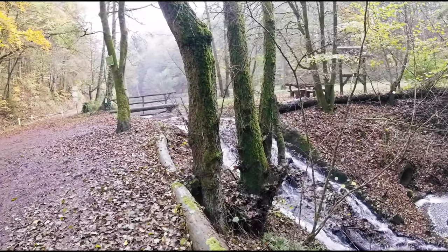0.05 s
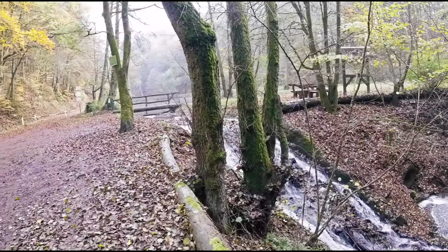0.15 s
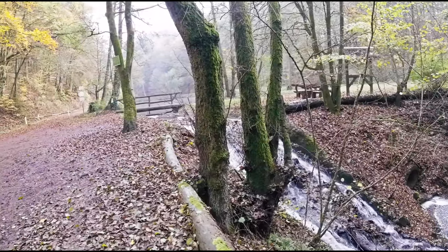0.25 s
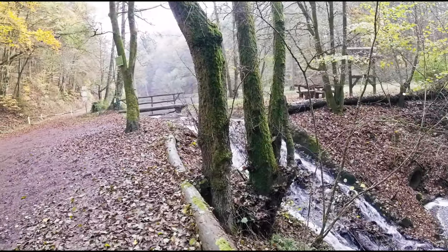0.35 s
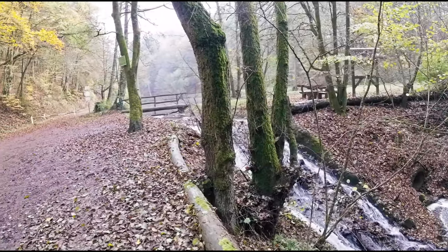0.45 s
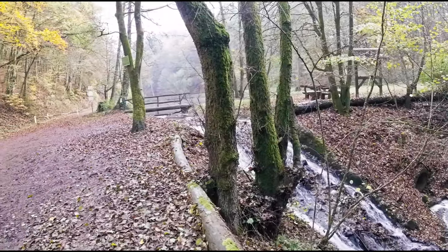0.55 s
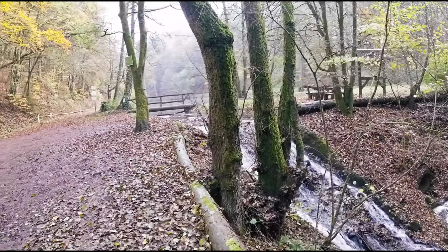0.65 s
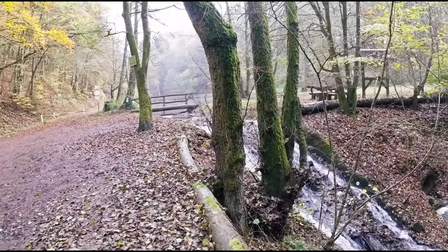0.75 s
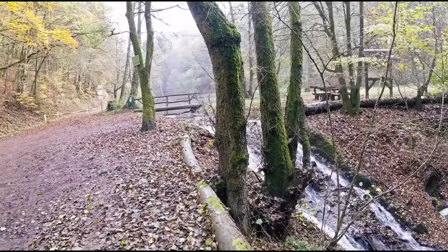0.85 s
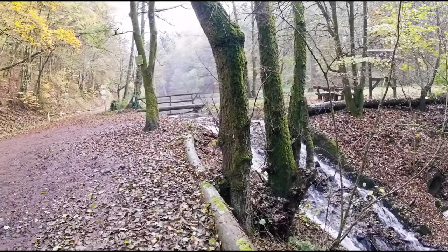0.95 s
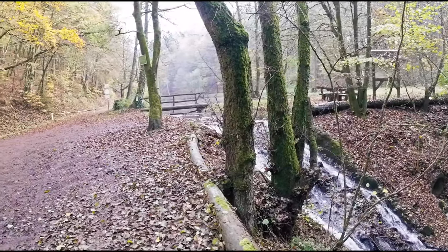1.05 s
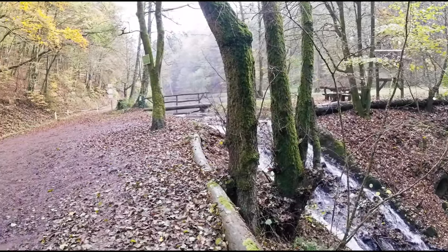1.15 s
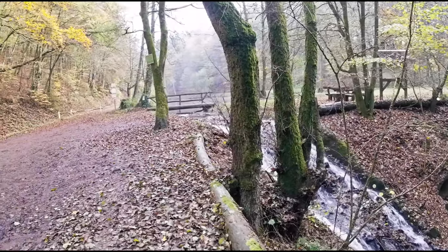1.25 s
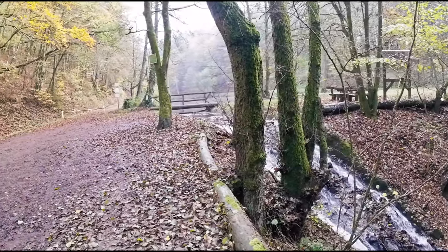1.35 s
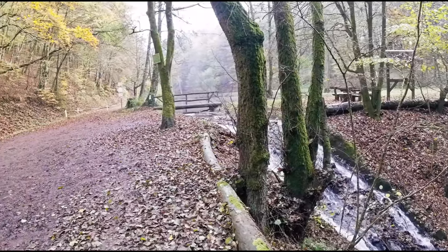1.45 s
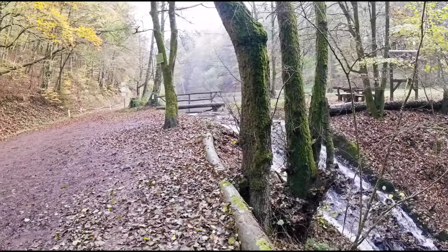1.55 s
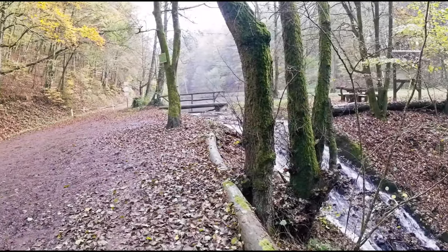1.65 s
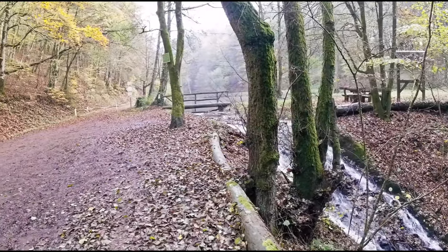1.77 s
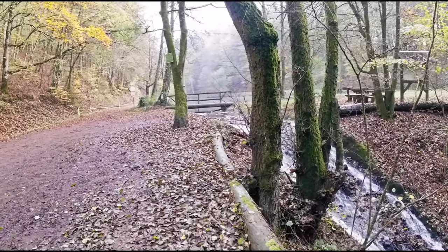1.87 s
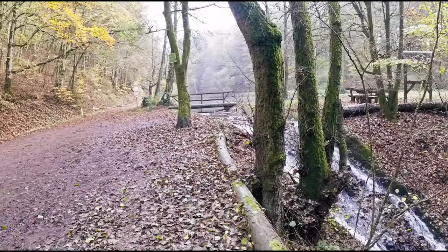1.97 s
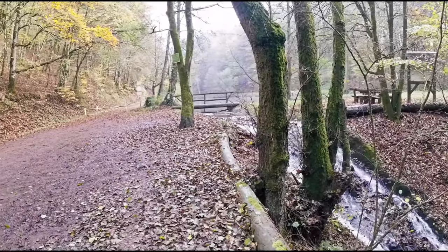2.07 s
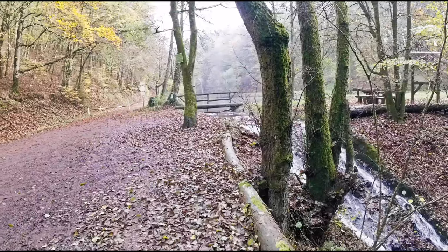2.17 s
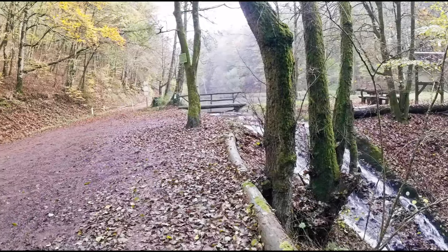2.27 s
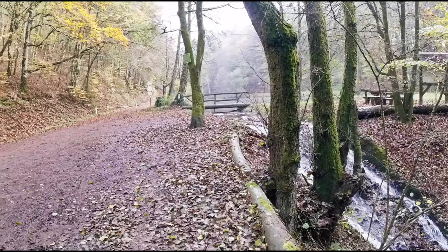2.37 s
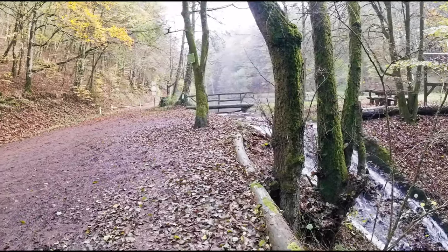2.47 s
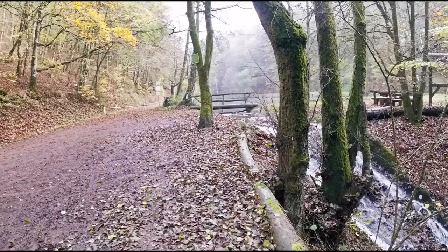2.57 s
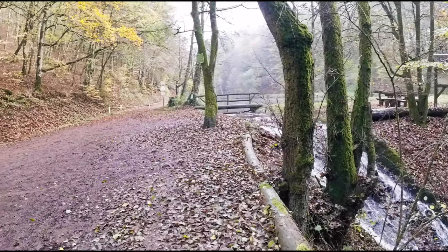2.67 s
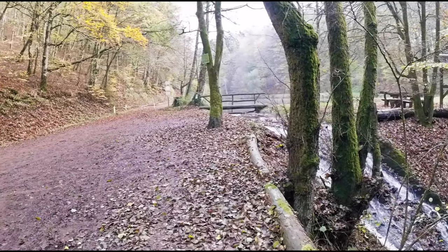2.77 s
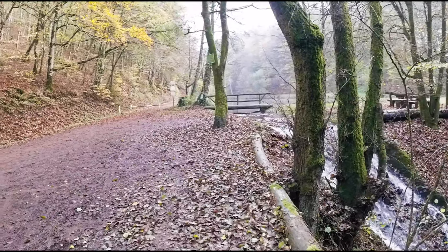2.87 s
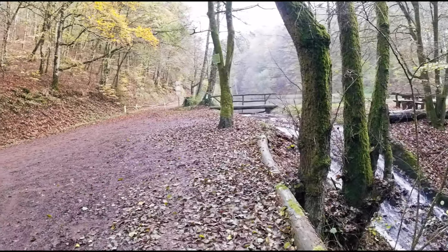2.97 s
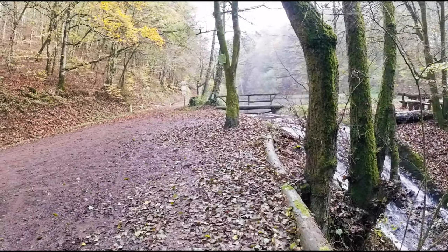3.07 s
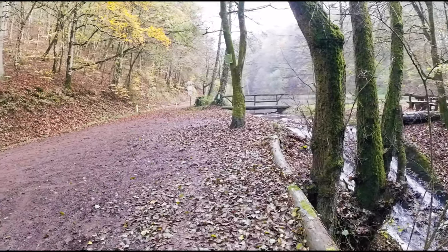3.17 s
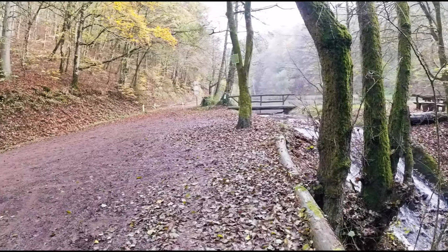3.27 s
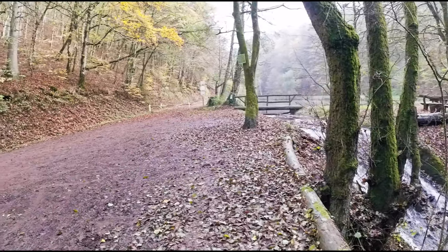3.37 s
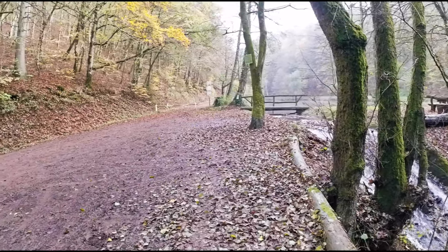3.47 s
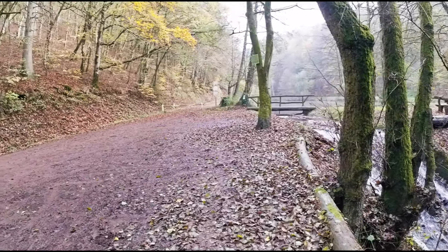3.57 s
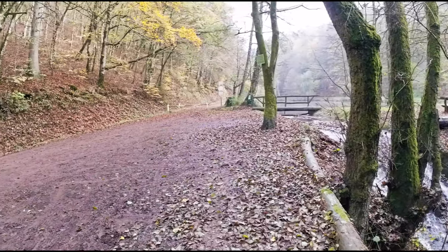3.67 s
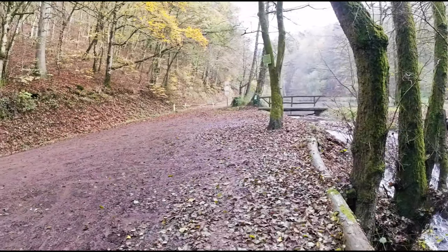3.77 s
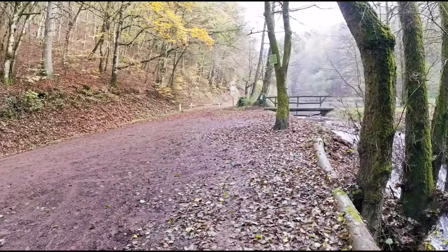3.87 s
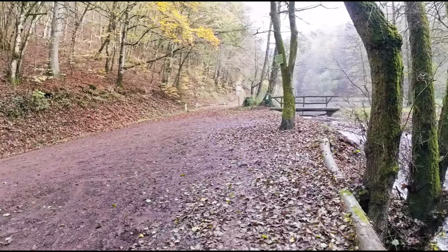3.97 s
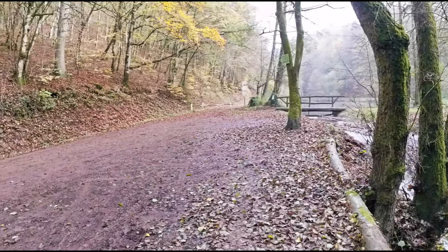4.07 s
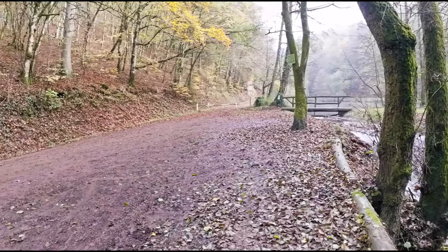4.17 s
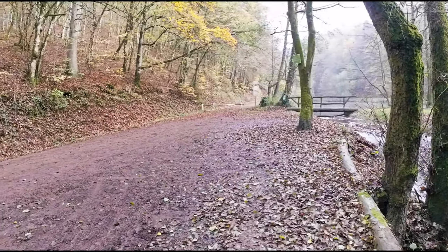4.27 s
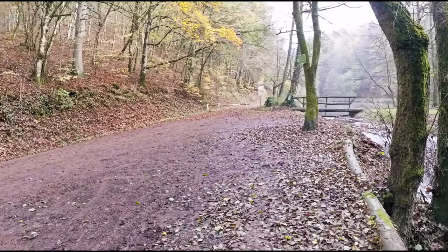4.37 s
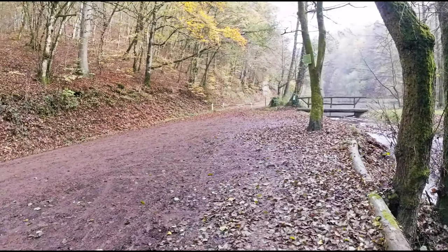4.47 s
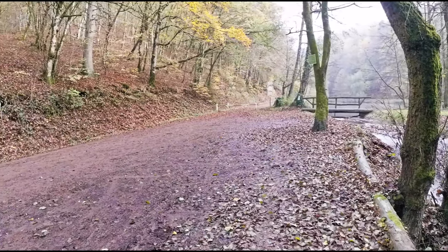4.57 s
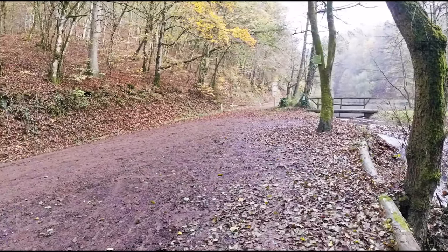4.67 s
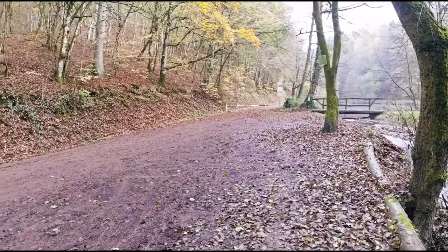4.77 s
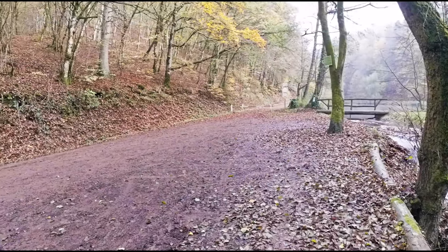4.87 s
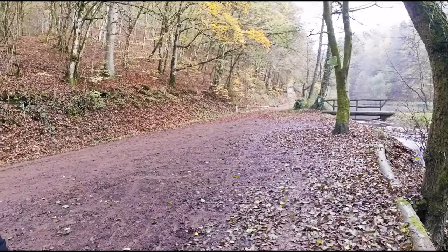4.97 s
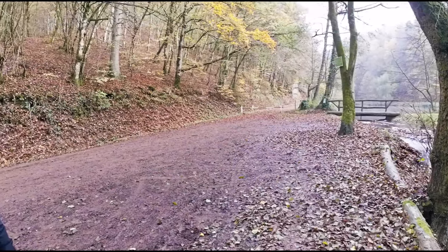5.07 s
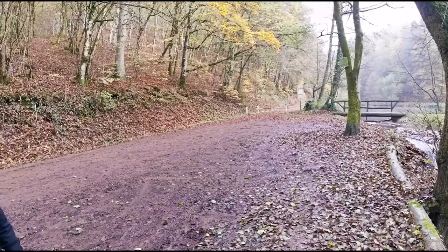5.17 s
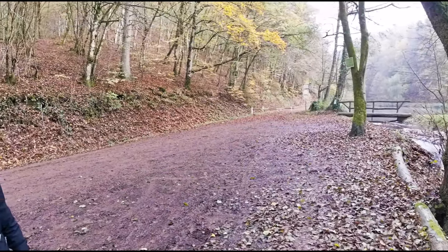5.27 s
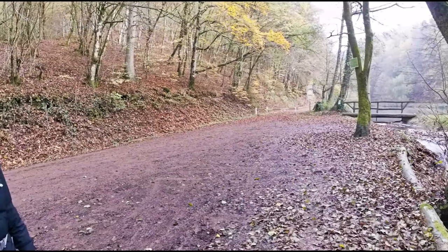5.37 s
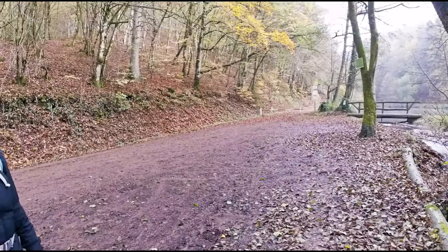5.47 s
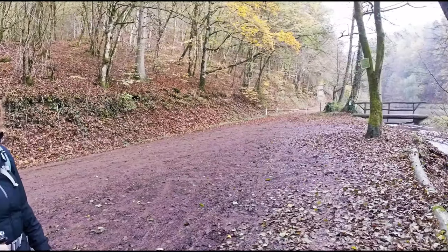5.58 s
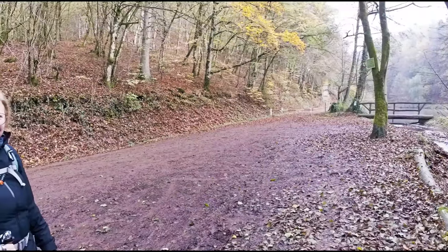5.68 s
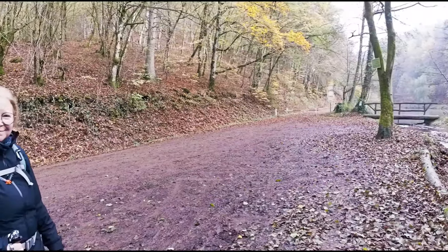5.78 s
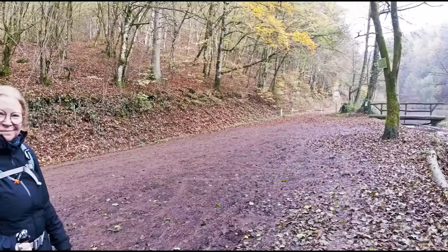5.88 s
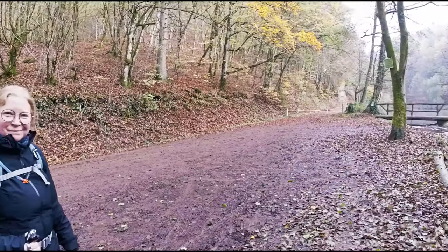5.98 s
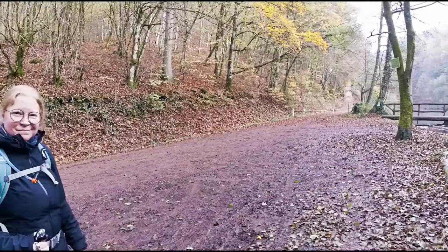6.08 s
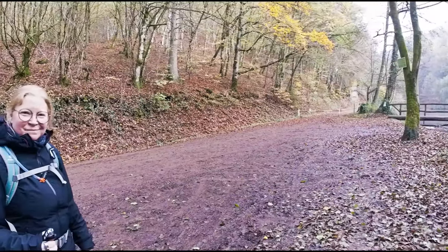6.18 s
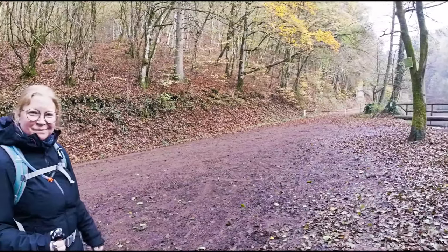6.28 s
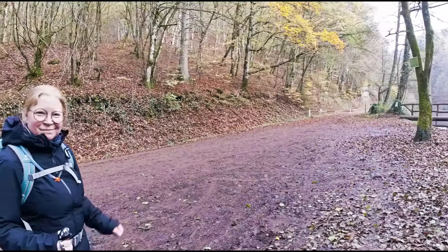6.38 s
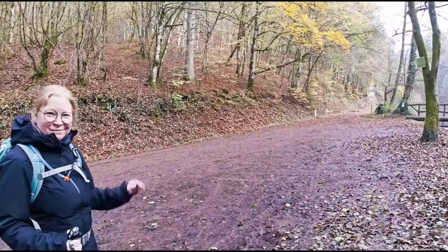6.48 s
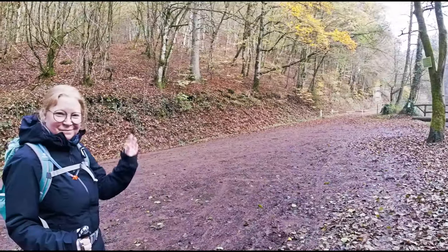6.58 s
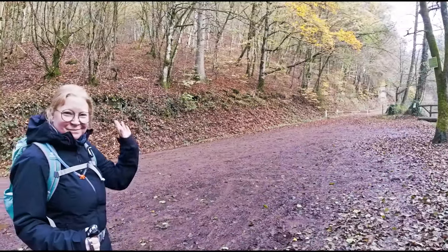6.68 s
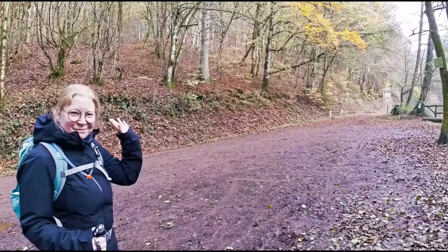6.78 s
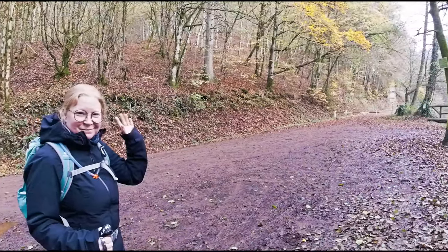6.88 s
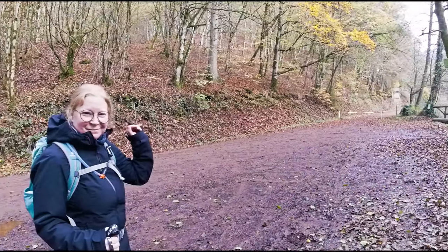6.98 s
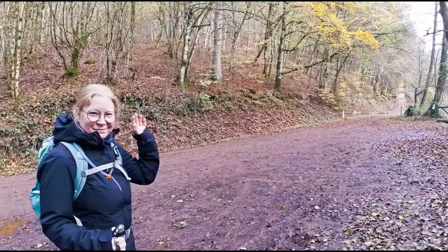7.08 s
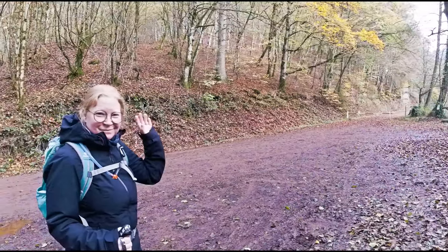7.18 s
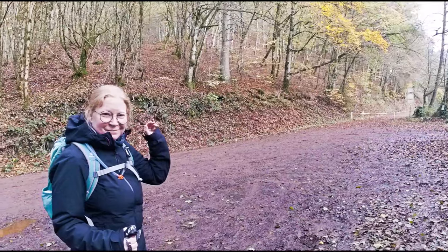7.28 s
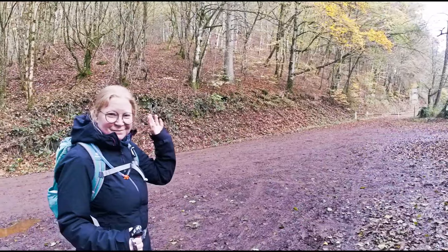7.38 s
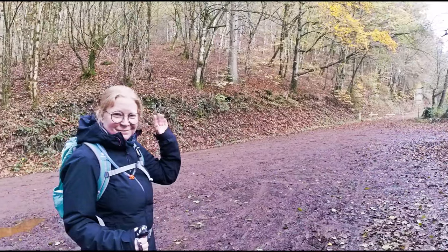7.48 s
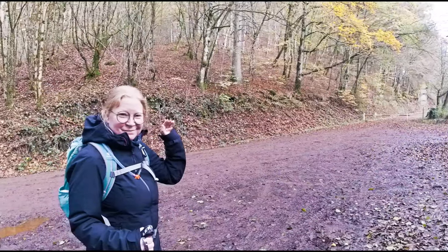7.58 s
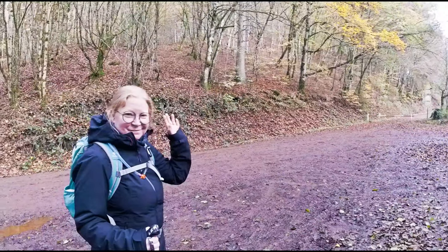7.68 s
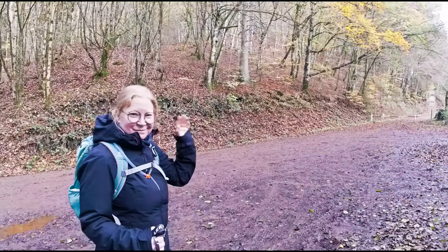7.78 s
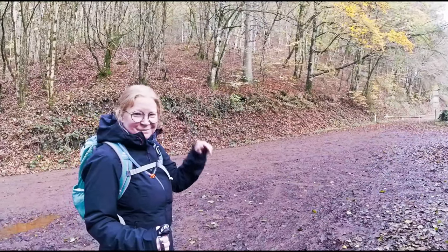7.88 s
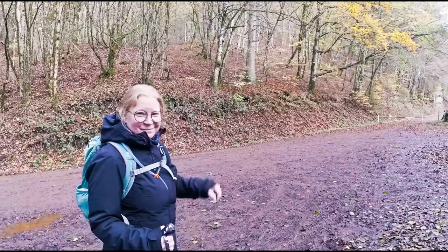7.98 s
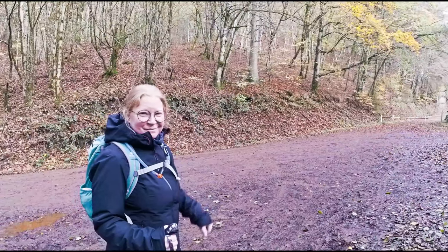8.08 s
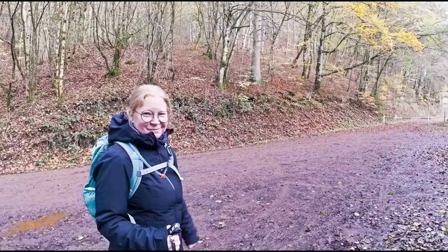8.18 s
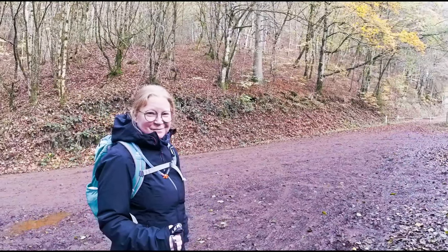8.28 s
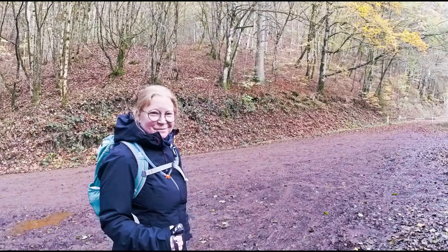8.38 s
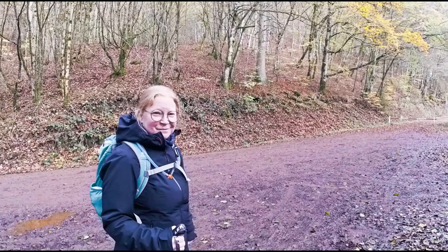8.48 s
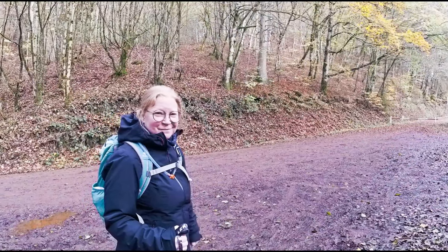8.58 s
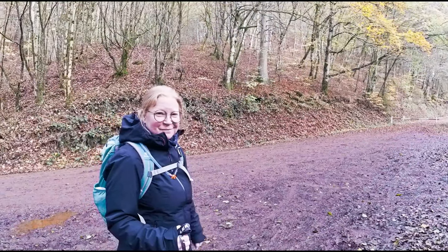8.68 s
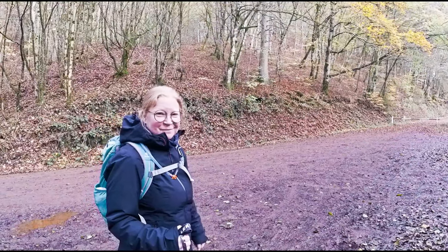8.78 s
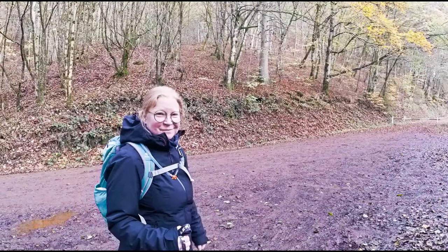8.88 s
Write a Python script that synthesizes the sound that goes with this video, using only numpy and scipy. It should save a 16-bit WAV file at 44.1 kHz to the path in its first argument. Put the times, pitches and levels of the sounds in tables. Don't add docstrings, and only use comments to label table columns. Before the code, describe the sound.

From 0 seconds a forest stream rushes down a stepped cascade a few metres from one microphone: a dense, even roar of merged bubbles, strongest in the midrange, flickering finely, with droplets crackling on top and small bubbles ringing in clumps. The top is limited, with little airy hiss. Underneath, a trapped air pocket gulps at low pitch, busiest in the first two seconds and around 3.6 to 5, and a hand makes faint dull thuds on the microphone housing. After 1 second the microphone slowly turns away, making the water gradually a little quieter and duller until 7. A small high plop comes at the very start, lower ones near 3.4 and 4.5, fuller ones near 6.8 and 7.4, and a last higher one at 8.7, almost lost in the fade. From 7 everything fades steadily, reaching silence at about 9.

```python
import sys
import numpy as np
from scipy import signal
from scipy.fft import rfft, irfft, next_fast_len
from scipy.io import wavfile

SR = 44100
rng = np.random.default_rng(int(sys.argv[2]) if len(sys.argv) > 2 else 0)


def generate_wav(sig):
    pcm = np.round(np.clip(np.atleast_2d(sig).T, -1, 1) * 32767).astype(np.int16)
    wavfile.write(sys.argv[1], SR, pcm)


def gain_from_decibels(decibels):
    exponent = np.asarray(decibels, float) / 20
    return 10 ** exponent


N = 394254
SECONDS = np.arange(N) / SR
FIRST_RATE_HZ = 16000


def rms_one(x):
    return x / np.sqrt(np.mean(x ** 2) + 1e-20)


def drift(rate):
    r = np.exp(-80 * np.pi * rate / SR)
    noise = rng.standard_normal(N // 40 + 2002)
    slow = signal.lfilter([1], [1, -2 * r, r * r], noise)[2000:]
    return np.interp(np.arange(N) / 40, np.arange(len(slow)), rms_one(slow))


def ring(clicks, hz, t60):
    r = gain_from_decibels(-60 / (t60 * SR))
    w = 2 * np.pi * hz / SR
    return signal.lfilter([0, np.sin(w)], [1, -2 * r * np.cos(w), r * r], clicks + 1e-18)


def grains(per_s, spread_db):
    sizes = gain_from_decibels(spread_db * np.minimum(rng.exponential(1, N), 4))
    signs = rng.choice([-1, 1], N)
    return rms_one(sizes * signs * (rng.random(N) < per_s / SR))


def coloured(x, spectrum):
    size = next_fast_len(N)
    hz = np.maximum(np.fft.rfftfreq(size, 1 / SR), 1)
    table_hz, table_db = np.transpose(spectrum)
    return rfft(x, size) * gain_from_decibels(np.interp(np.log(hz), np.log(table_hz), table_db)), hz


def blips(events, rise_s, trim_db):
    out = np.zeros(N + SR)
    t = np.arange(SR // 4) / SR
    shape = (t / rise_s * np.exp(1 - t / rise_s)) ** 2
    for s, peak_db, hz in events:
        at = max(round((s - 0.4 * rise_s) * SR), 0)
        tone = np.sin(2 * np.pi * hz * t * (0.966 + 0.3 * t))
        out[at:at + len(t)] += gain_from_decibels(peak_db + trim_db) * shape * tone
    return out[:N]


# (time [s], turn [0-1])
MICROPHONE_TURN = [(0.0, 0.04), (1.0, 0), (2.5, 0.17), (4.4, 0.41), (5.2, 0.64), (7.0, 1), (8.94, 1.18)]


def microphone_turn():
    s, turn = np.transpose(MICROPHONE_TURN)
    return np.interp(SECONDS, s, turn)


# (frequency [Hz], level [dB])
ROAR_COLOUR = [(25, -52.5), (160, -23), (188, -15), (235, -16.5), (320, -8), (430, -3), (705, -5),
               (755, 0.5), (1100, -3), (1900, -5.5), (4400, -7.5), (6100, -13.5), (7330, -25), (8000, -37)]


def cascade(treble_db, bass_db):
    bass_hz, middle_hz, treble_hz = 336, 1000, 2300
    roar, hz = coloured(rng.standard_normal(N), ROAR_COLOUR)
    crackle, hz = coloured(grains(per_s=900.0, spread_db=4.0), ROAR_COLOUR)
    droplets = np.clip(0.37 / (1 + (7000 / hz) ** 3.0), 0, 0.95)
    water = np.sqrt(1 - droplets) * roar + np.sqrt(droplets) * crackle
    surge_db = 0.18 * drift(1.8) + 0.23 * drift(15.0)
    treble_change_db = treble_db - treble_db[:SR].mean()
    bass_change_db = bass_db - bass_db[:SR].mean()
    step = 0.4
    out = 0
    for centre in 30 * 2 ** np.arange(0, 8.6, step):
        band = np.clip(1 - np.abs(np.log2(hz / centre)) / step, 0, 1)
        part = irfft(water * band)[:N]
        up = np.clip(np.log(centre / middle_hz) / np.log(treble_hz / middle_hz), 0, 1.3)
        down = np.clip(np.log(middle_hz / centre) / np.log(middle_hz / bass_hz), 0, 1)
        colour_db = up * treble_change_db + down * bass_change_db
        lumpy_db = 2.5 if centre < 240 else 0.33 + 0.11 * up
        out = out + part * gain_from_decibels(colour_db + lumpy_db * drift(20.0) + surge_db)
    middle_band = signal.butter(4, [500, 1500], "band", fs=SR, output="sos")
    return out / np.std(signal.sosfilt(middle_band, out[:2 * SR]))


def bubbles():
    clicks = grains(per_s=250.0, spread_db=3.5)
    clicks = clicks * gain_from_decibels(3.0 * drift(4.5))
    pitches = np.geomspace(420, 2600, num=16)
    dealt = rng.integers(0, len(pitches), N)
    rings = sum(ring(clicks * (dealt == k), hz, 18.0 / hz) for k, hz in enumerate(pitches))
    band = signal.butter(3, [300, 4000], "band", fs=SR, output="sos")
    return rms_one(signal.sosfilt(band, rings))


# (time [s], peak level [dB], pitch [Hz])
HAND_THUDS = [(0.0, -51, 60), (0.12, -50, 135), (0.6, -49, 125), (1.07, -57, 100), (1.97, -52, 135),
              (3.12, -60, 55), (3.21, -65, 120), (3.63, -57, 135), (4.83, -57, 135), (5.37, -54, 120),
              (6.2, -57, 90), (6.72, -55, 121), (7.0, -59, 101), (8.04, -60, 110)]


def hand():
    return blips(HAND_THUDS, rise_s=0.014, trim_db=-0.5)


# (time [s], peak level [dB], pitch [Hz])
STRONG_GLUGS = [(0.063, -43, 192), (0.119, -37, 219), (0.188, -38, 183), (0.528, -40, 194),
                (0.723, -37, 195), (0.844, -46, 199), (1.082, -40, 204), (1.133, -41, 178),
                (1.189, -43, 202), (1.28, -44, 204), (1.552, -39, 195), (1.744, -42, 207),
                (1.966, -42, 198), (2.501, -41, 195), (2.74, -43, 196), (2.93, -41, 194), (3.598, -43, 188),
                (3.773, -40, 199), (3.83, -42, 196), (3.919, -44, 191), (4.002, -42, 194),
                (4.258, -45, 216), (4.433, -43, 203), (4.558, -42, 189), (4.826, -42, 210),
                (4.915, -40.5, 190), (5.894, -45, 186), (6.098, -42, 194), (7.349, -42.5, 192.8),
                (7.457, -42, 207)]


def air_pocket():
    count = 34
    chance = rng.standard_normal((count, 3))
    jitter = np.clip(0.3 * chance[:, 0], -0.5, 0.5)
    s = (np.arange(count) + 0.5 + jitter) * N / SR / count
    peak_db = -49 + 2 * chance[:, 1]
    pitch_hz = 195 + 12 * chance[:, 2]
    weak_glugs = np.transpose([s, peak_db, pitch_hz])
    return blips([*STRONG_GLUGS, *weak_glugs], rise_s=0.0202, trim_db=-3.5)


# (time [s], peak level [dB], pitch [Hz])
BIG_BUBBLES = [
    (0.065, -27, 1270),
    (3.36, -25, 764),
    (4.549, -25, 790),
    (6.832, -23, 860),
    (7.436, -24, 870),
    (8.717, -23, 960),
]


def plops():
    return blips(BIG_BUBBLES, rise_s=0.004, trim_db=-0.5)


def scene():
    turn = microphone_turn()
    water = cascade(treble_db=-1.8 * turn, bass_db=-0.8 * turn) + gain_from_decibels(-14.0) * bubbles()
    water = gain_from_decibels(-30.5 - 2.5 * turn) * water
    fade_start_s, fade_end_s = 7.03, 9.01
    fade = np.clip((fade_end_s - SECONDS) / (fade_end_s - fade_start_s), 0, 1)
    mono = fade * (water + hand() + air_pocket() + plops())
    return np.array([mono, mono])


# (frequency [Hz], level against the mirrored sound [dB])
MIRROR_COLOUR = [(8000, 2), (8800, -19), (9600, -39.5), (10000, -63), (10500, -52), (12400, -56.5),
                 (13150, -52), (13600, -54.5), (13950, -66.5), (14400, -53.5), (14900, -52.5),
                 (15250, -71.5), (15700, -65)]


def mirror_image(low):
    flipped = 2 * low * np.cos(2 * np.pi * FIRST_RATE_HZ * SECONDS)
    image, hz = coloured(flipped, MIRROR_COLOUR)
    return irfft(image * (hz >= FIRST_RATE_HZ / 2) * (hz < FIRST_RATE_HZ))[:N]


def low_pass(x):
    return signal.sosfilt(signal.butter(12, 15700, fs=SR, output="sos"), x)


def record(dry):
    sound, hz = coloured(dry[0], [(1, 0), (SR, 0)])
    low = irfft(sound * (hz < FIRST_RATE_HZ / 2))[:N]
    mono = low + mirror_image(low)
    return low_pass(np.array([mono, mono]))


dry = scene()
out = record(dry)
generate_wav(out)
```